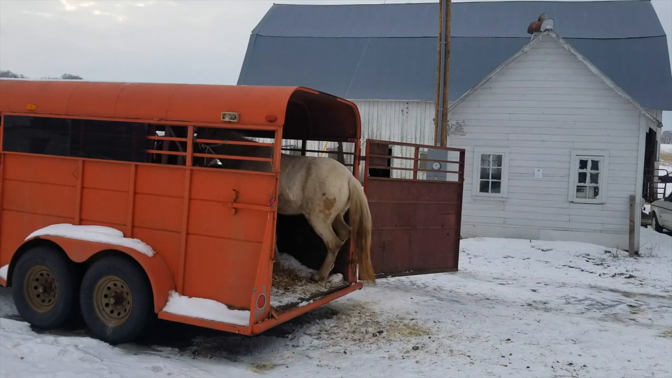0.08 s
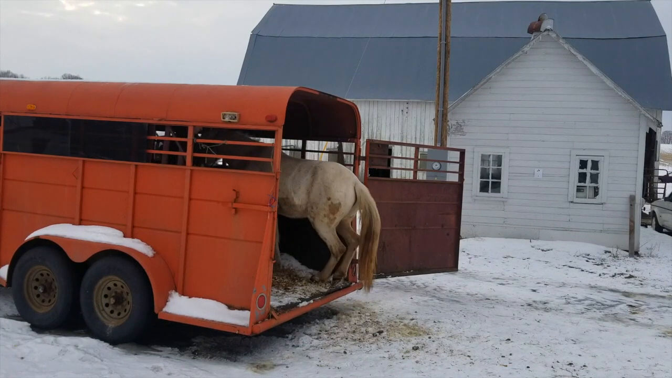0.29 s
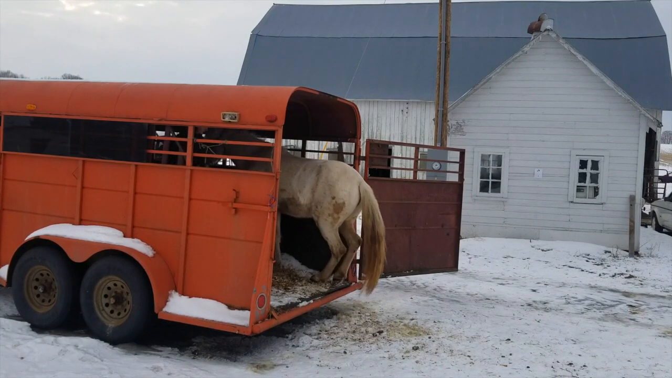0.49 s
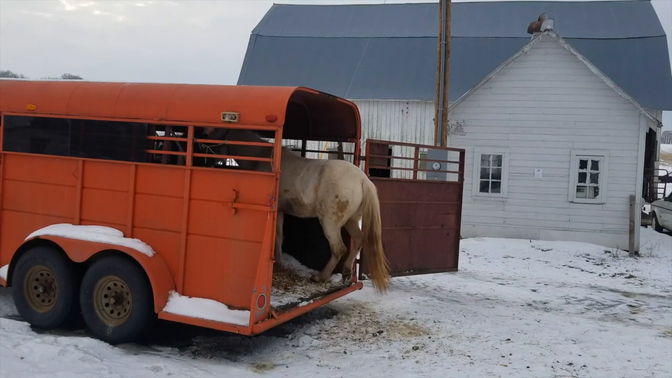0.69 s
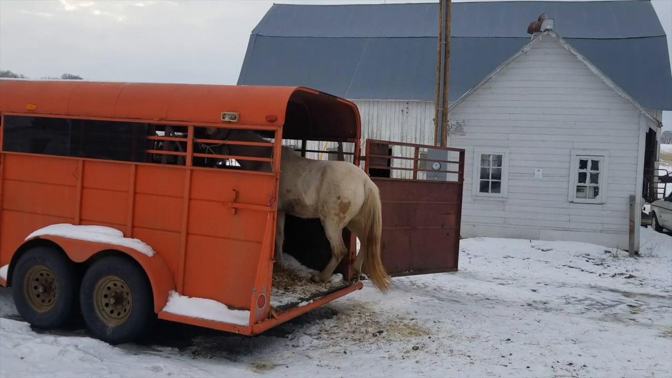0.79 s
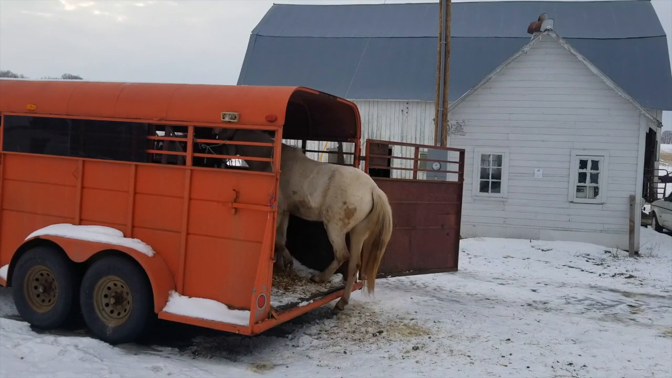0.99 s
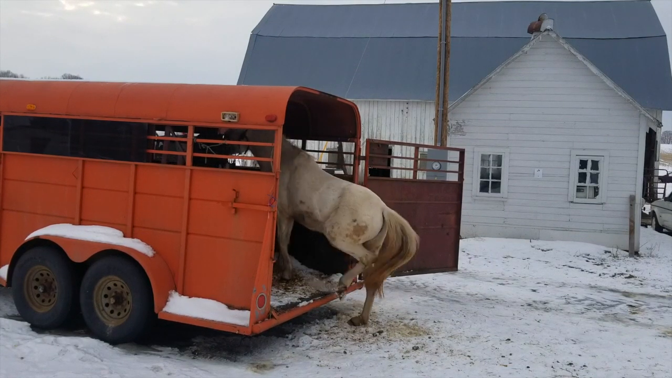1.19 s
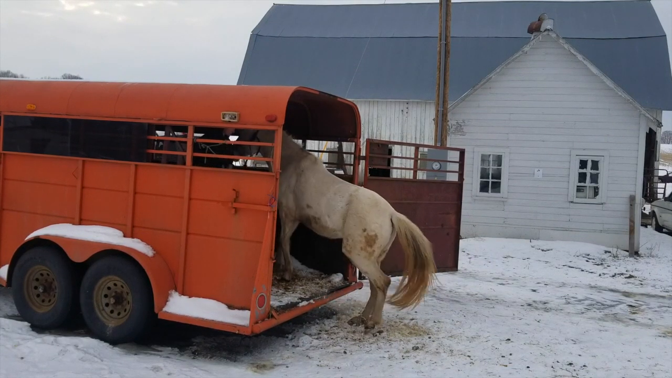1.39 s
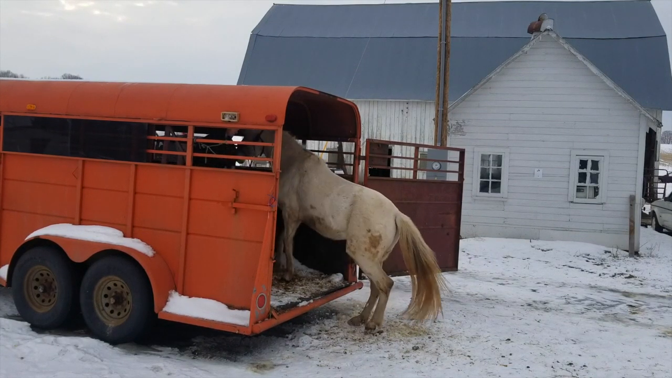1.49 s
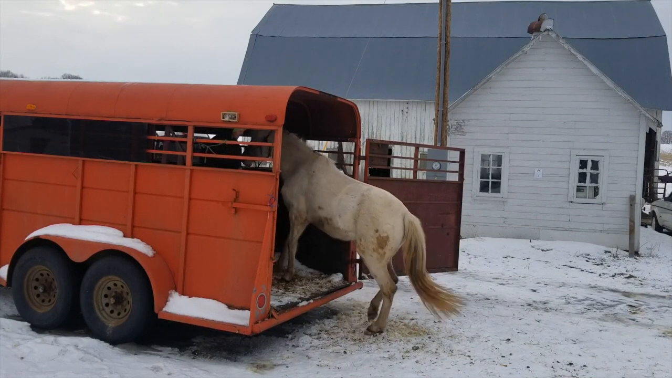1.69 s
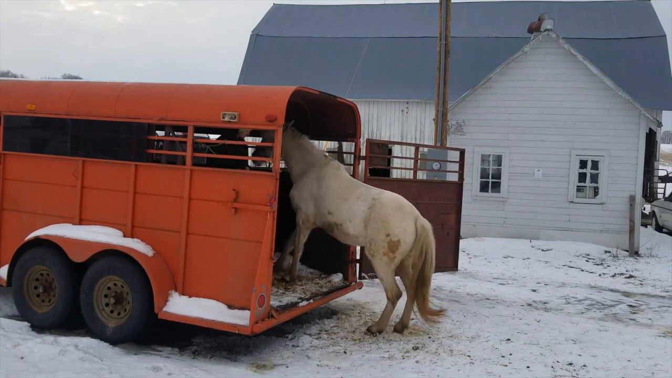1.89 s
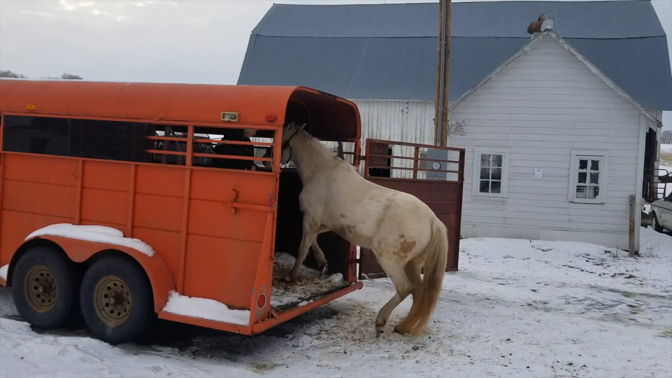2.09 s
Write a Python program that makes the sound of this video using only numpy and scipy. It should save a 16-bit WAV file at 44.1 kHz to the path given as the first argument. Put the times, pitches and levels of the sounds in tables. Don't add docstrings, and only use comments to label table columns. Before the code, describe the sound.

Hooves on a steel trailer floor, a big low boom with rattle first, then a double knock, frame ringing, and sliding crunches on icy snow; quiet outdoor hiss, left channel bright and resonant, right muffled.

```python
import sys
import numpy as np
from scipy import signal
from scipy.fft import rfft, irfft
from scipy.io import wavfile
from scipy.ndimage import uniform_filter1d, map_coordinates

SR = 44100
rng = np.random.default_rng(int(sys.argv[2]) if len(sys.argv) > 2 else 0)


def master_out(mix):
    frames = np.transpose(np.atleast_2d(mix))
    ceiling = np.clip(frames, -1, 1)
    pcm = np.round(ceiling * 32767).astype(np.int16)
    wavfile.write(sys.argv[1], SR, pcm)


def gain_from_db(level_db):
    decades = np.asarray(level_db, float) / 20
    return 10 ** decades


N = 92610

# pitch_hz, level_db (per Hz)
RUMBLE_TONE = [(25, -11), (48, -1.5), (120, -11), (330, -17), (600, -37.5), (1700, -27.5), (4200, -33.5),
               (16000, -30.5)]
RUMBLE_DB = -60
WHINE_HZ, WHINE_DB = 2593, -68

# start_s, length_s, level_db, body_db (dull part against the bright part)
CRUNCHES = [(0, 0.09, -58.5, 0.5), (0.093, 0.11, -64.5, 4), (0.181, 0.051, -75.5, 18.5),
            (0.561, 0.16, -60.5, 0), (1.068, 0.024, -45, -2), (1.082, 0.039, -45, 3),
            (1.103, 0.056, -44.5, 8), (1.136, 0.025, -45, 2.5), (1.148, 0.016, -37.5, 0),
            (1.156, 0.056, -50.5, 4.5), (1.222, 0.032, -60.5, 3), (1.279, 0.06, -62.5, -31),
            (1.344, 0.013, -49, -22), (1.349, 0.028, -43.5, -6), (1.361, 0.15, -61.5, -1),
            (1.471, 0.085, -66, 0.5), (1.565, 0.059, -63, -29), (1.609, 0.091, -57.5, -9),
            (1.671, 0.063, -64.5, 3.5), (1.722, 0.084, -64.5, 3), (1.788, 0.035, -46, -5.5),
            (1.81, 0.074, -59, -1), (1.879, 0.078, -60, -6.5), (1.907, 0.11, -57.5, -2.5),
            (1.979, 0.12, -58, -7)]
GRAINS_PER_S, GRAIN_SPREAD_DB = 9000, 2.2
CRUNCH_RISE = .3
BODY_HZ, SNAP_HZ, SNAP_TOP_HZ, AIR_DB = 1026, 4360, 9400, -13.5
# pitch_hz, level_db, sharpness
SILL_NOTES = [(209, -2, 14), (268, 1, 14.2), (314.4, -9.5, 31), (359.5, -2.5, 18), (438, -9, 27),
              (552, -5.5, 75), (625, -7.5, 25), (675, -2, 50), (1207, -2, 65)]
SILL_DB = 5

# peak_s, level_db, pitch_hz, swell_s
BOOMS = [
    (0.031, -48, 104.2, 0.035),
    (.250, -22, 71.6, 0.019),
    (0.471, -37, 69, 0.017),
    (0.623, -46.5, 71, 0.034),
    (1.112, -37.5, 98.6, 0.0091),
    (1.331, -52.5, 43, 0.027),
    (1.386, -64, 103, 0.06),
    (1.479, -56, 42.6, .03),
    (2.0, -59, 65.6, 0.045),
]
# start_s, ring_db, knock_db, clatter_db
BLOWS = [
    (0.191, -33, -49.5, -40),
    (0.269, -51, -76, -53.5),
    (0.589, -78, -47, -56),
    (1.074, -50, -32, -48.5),
    (1.141, -65, -29.5, -53),
    (1.743, -86, -44, -62.5),
]
# pitch_hz, level_db, fade_s (time to fall 60 dB)
FLOOR_NOTES = [(67.3, -12, 0.53), (71.04, -2, 0.88), (76.37, -1, 1.28), (50.65, -17, 2.6), (38, -10, 0.6),
               (162.2, -23, 0.33), (244.7, -16, 0.77), (324.7, -19.5, 0.47), (409, -39, 0.34),
               (665, -39, .5)]
RING_RISE_S = 0.056
KNOCK_HZ, KNOCK_MS = 376, 1.5
# pitch_hz, level_db
CLATTER_TONE = [(30, -9), (55, 1.5), (110, -1), (150, -11), (400, -19.5), (1600, -28.5), (2100, -36),
                (8000, -57)]
CLATTER_FADE_S, CLATTER_RISE_S = 1.134, 0.0029

# start_s, level_db
CRACKS = [(.192, -47), (.443, -54), (1.144, -56), (1.156, -51), (1.298, -45), (1.359, -27.5),
          (1.584, -40.5), (1.601, -44), (1.636, -66), (1.644, -43), (1.650, -39.5), (1.678, -40.5),
          (1.797, -44), (1.804, -60), (1.827, -73), (2.006, -38.5), (2.012, -40), (2.025, -37),
          (2.033, -37)]
# start_s, level_db
KNOCKS = [
    (.194, -38.5),
    (.204, -43),
    (1.120, -46),
    (1.366, -40),
    (1.803, -39.5),
    (1.825, -44),
]

# pitch_hz, level_db, fade_s (time to fall 60 dB)
FRAME_NOTES = [(42.5, 0, .5), (88.5, -3, .5), (110, -11, .3), (203, -20, .4), (270, -11, .4),
               (321, -18, .4), (361, -16, .4), (564, -16, .25), (710, -19, .25)]
SPRING_S, SPRING_DB, SPRING_RISE_S = 1.148, -35, .015

ECHO_FADE_S, ECHO_DB = .22, -15
LOW_CUT_HZ = 24.6

# pitch_hz, level_db
LEFT_TONE = [(1800, 2), (2250, -0.5), (2800, 7.5), (4400, 9), (5050, -10), (6100, 2.5), (7500, -17),
             (10500, -10.5)]
# pitch_hz, level_db
LEFT_TOP_TONE = [(11500, -4.5), (12300, 11), (13300, -1.5), (14200, 20), (14700, 19), (15600, 8)]
# pitch_hz, level_db
RIGHT_TONE = [(60, -2.8), (200, -4.8), (380, -6), (700, -8), (1250, -8.5), (1550, -19), (2100, -22),
              (2700, -50)]
RIGHT_LATE_S = .00003
# pitch_hz, level_db
HISS_TONE = [(150, 28.5), (500, 9.5), (2200, 1.0), (7500, -1), (12000, 1.0)]
HISS_DB, TOP_HZ = -76.5, 15750


def noise():
    return rng.standard_normal(N)


def unit(x):
    return x / np.sqrt(np.mean(x ** 2))


def curve(points, hz):
    p = np.array(points, float)
    return np.interp(np.log(np.maximum(hz, 1)), np.log(p[:, 0]), p[:, 1])


def colour(x, db_of, size=4096):
    hz = np.arange(size // 2 + 1) * SR / size
    cepstrum = irfft(db_of(hz) * np.log(10) / 20)
    cepstrum[1:size // 2] *= 2
    cepstrum[size // 2 + 1:] = 0
    return signal.fftconvolve(x, irfft(np.exp(rfft(cepstrum))))[:N]


def band(x, hz, sharpness):
    return signal.lfilter(*signal.iirpeak(min(hz, .45 * SR), sharpness, fs=SR), x)


def walk(rate_hz):
    k = int(SR / rate_hz)
    steps = np.repeat(rng.standard_normal(N // k + 1), k)
    return 1.57 * uniform_filter1d(uniform_filter1d(steps, k), k)[:N]


def ring(t, notes):
    u = np.maximum(t, 0)
    return sum(gain_from_db(db - 60 * u / fade) * np.sin(2 * np.pi * hz * u) for hz, db, fade in notes)


def swell(t, rise_s):
    return 1 - np.exp(-(np.maximum(t, 0) / rise_s) ** 2)


def yard_rumble():
    out = 0
    for hz in 25 * 2 ** np.arange(0, 9.6, .5):
        waver_db = 3.15 * walk(6.2) if hz < 400 else .5 * walk(7)
        out = out + gain_from_db(curve(RUMBLE_TONE, hz) + waver_db) * band(band(noise(), hz, 2.38), hz, 2.38)
    return unit(out) * gain_from_db(RUMBLE_DB)


def tyre_whine():
    return unit(band(band(noise(), WHINE_HZ, 2.7), WHINE_HZ, 2.7)) * gain_from_db(WHINE_DB)


def snow_grains():
    breaks = rng.random(N) < GRAINS_PER_S / SR
    strength_db = GRAIN_SPREAD_DB * rng.exponential(size=N)
    return unit(breaks * noise() * gain_from_db(strength_db))


def hoof_crunches(t):
    snap, body = snow_grains(), snow_grains()
    snap = unit(band(snap, SNAP_HZ, 1.4)) + gain_from_db(AIR_DB) * snap
    bright, dull = 0, 0
    for start, length, db, body_db in CRUNCHES:
        u = np.clip((t - start) / length, 0, 9)
        push = gain_from_db(db) * np.minimum(u / CRUNCH_RISE, 1) * np.exp(-2 * u ** 2)
        bright = bright + push * snap
        dull = dull + gain_from_db(body_db + 12) * push * body
    return bright, dull


def snow_body(dull):
    return band(dull, BODY_HZ, 1.41)


def sill_ring(dull):
    out = 0
    for k, (hz, db, sharpness) in enumerate(SILL_NOTES):
        out = out + (-1) ** k * gain_from_db(SILL_DB + db) * band(dull, hz, sharpness)
    return out


def floor_booms(t):
    out = 0
    for peak, db, hz, swell_s in BOOMS:
        u = t - peak
        out = out + gain_from_db(db) * np.exp(-.5 * (u / swell_s) ** 2) * np.sin(2 * np.pi * hz * u)
    return out


def hoof_blows(t):
    rattle = unit(colour(noise(), lambda hz: curve(CLATTER_TONE, hz)))
    out = 0
    for start, ring_db, knock_db, clatter_db in BLOWS:
        u = np.maximum(t - start, 0)
        floor = gain_from_db(ring_db) * swell(u, RING_RISE_S) * ring(u, FLOOR_NOTES)
        knock = gain_from_db(knock_db) * np.exp(-u * 1000 / KNOCK_MS) * np.sin(2 * np.pi * KNOCK_HZ * u)
        clatter = (1 - np.exp(-u / CLATTER_RISE_S)) * gain_from_db(clatter_db - 60 * u / CLATTER_FADE_S) * rattle
        out = out + floor + knock + clatter
    return out


def clicks(events, gain_db):
    out = np.zeros(N)
    for start, db in events:
        out[int(start * SR)] += gain_from_db(db + gain_db)
    return out


def crust_cracks():
    return band(band(clicks(CRACKS, 15), SNAP_HZ, 1.1), SNAP_HZ, 1.1)


def crust_knocks():
    return clicks(KNOCKS, 22.5)


def frame_spring(t):
    u = t - SPRING_S
    return gain_from_db(SPRING_DB) * swell(u, SPRING_RISE_S) * ring(u, FRAME_NOTES)


def wall_echo(x, t):
    lag = t[:SR // 2]
    echo = rng.standard_normal(len(lag)) * gain_from_db(-60 * lag / ECHO_FADE_S) * (lag > .004)
    echo = echo / np.sqrt(np.sum(echo ** 2))
    return gain_from_db(ECHO_DB) * signal.fftconvolve(x, echo)[:N]


def scene():
    t = np.arange(N) / SR
    far = yard_rumble() + tyre_whine()
    bright, dull = hoof_crunches(t)
    dull = dull + crust_knocks()
    steps = bright + snow_body(dull) + sill_ring(dull) + crust_cracks()
    steps = signal.lfilter(*signal.butter(1, SNAP_TOP_HZ, fs=SR), steps)
    steps = steps + wall_echo(steps, t)
    trailer = floor_booms(t) + hoof_blows(t) + frame_spring(t)
    mono = signal.lfilter(*signal.butter(2, LOW_CUT_HZ, "high", fs=SR), steps + trailer + far)
    return np.array([mono, mono])


def band_limit(x):
    return signal.sosfilt(signal.butter(12, 16380, fs=SR, output="sos"), x)


def record(dry):
    offset_db = LEFT_TONE[0][1] + LEFT_TOP_TONE[0][1]
    left = colour(dry[0], lambda hz: curve(LEFT_TONE, hz) + curve(LEFT_TOP_TONE, hz) - offset_db)
    right = colour(dry[1], lambda hz: curve(RIGHT_TONE, hz))
    right = map_coordinates(right, [np.arange(N) - RIGHT_LATE_S * SR], mode="mirror")
    hiss = np.array([colour(noise(), lambda hz: curve(HISS_TONE, hz)) for _ in range(2)])
    top_cut = signal.ellip(10, .2, 60, TOP_HZ, fs=SR, output="sos")
    mix = signal.sosfilt(top_cut, np.array([left, right]) + gain_from_db(HISS_DB) * hiss)
    return band_limit(mix)


dry = scene()
out = record(dry)
master_out(out)
```